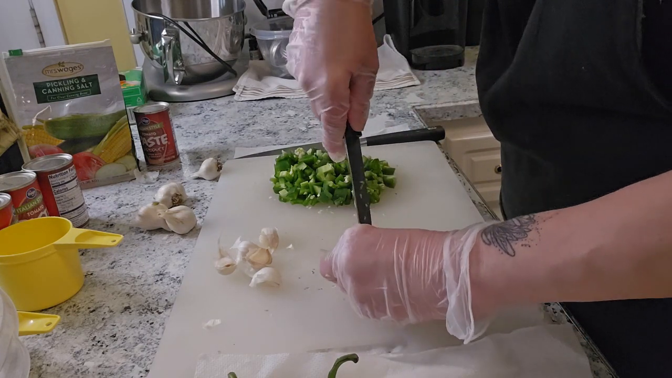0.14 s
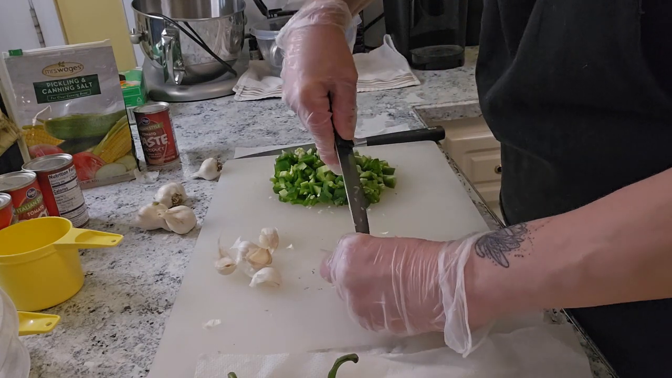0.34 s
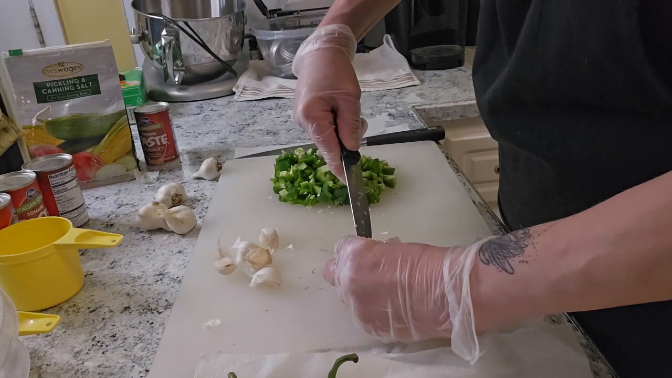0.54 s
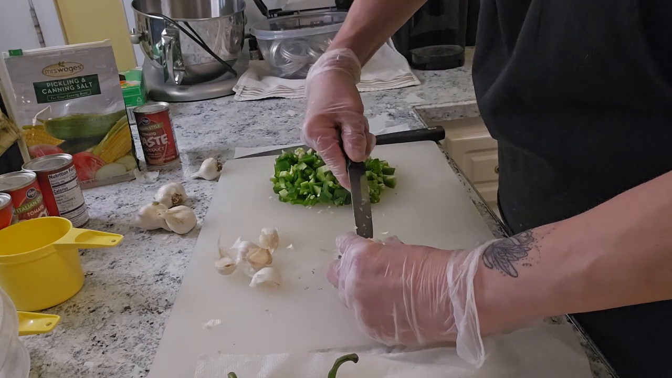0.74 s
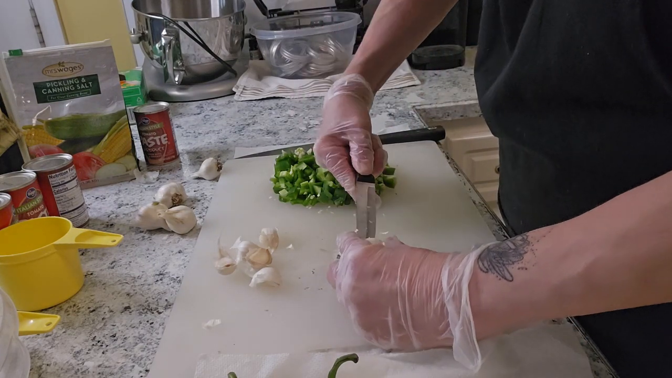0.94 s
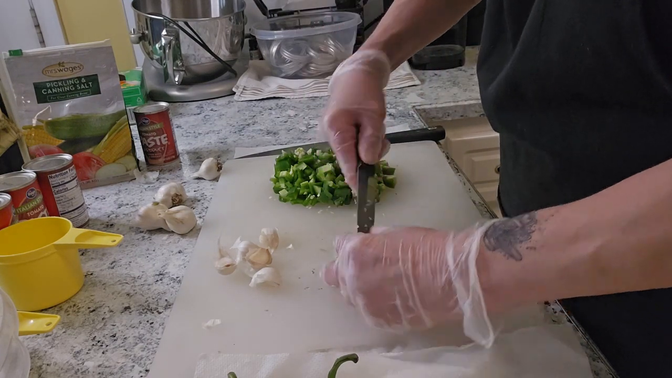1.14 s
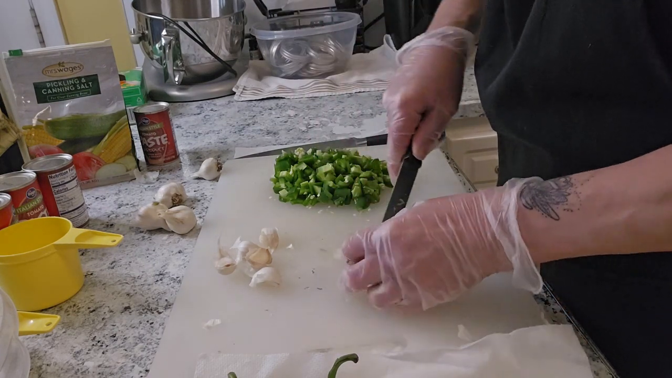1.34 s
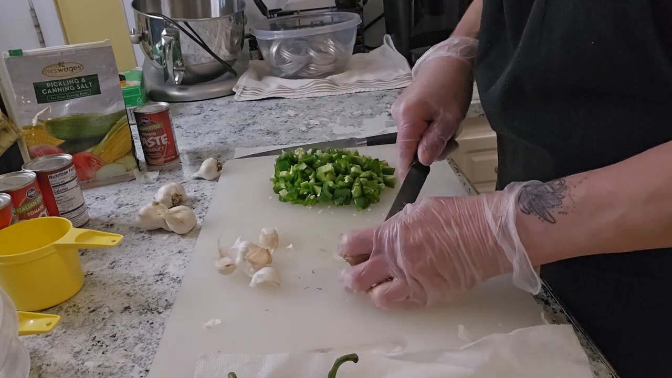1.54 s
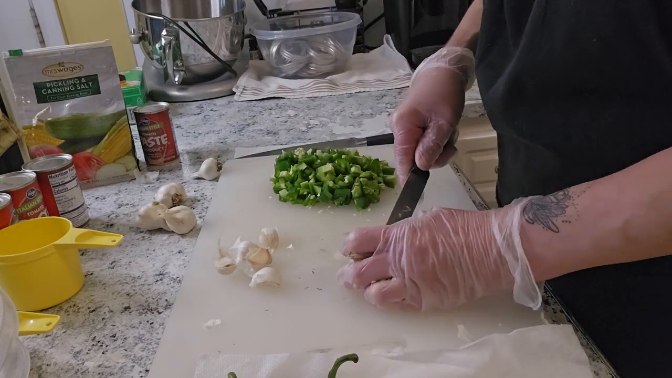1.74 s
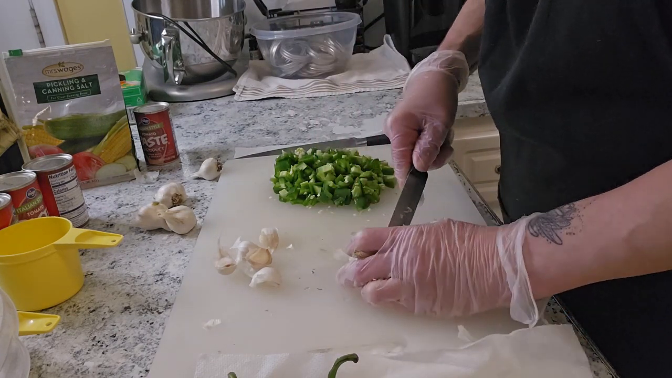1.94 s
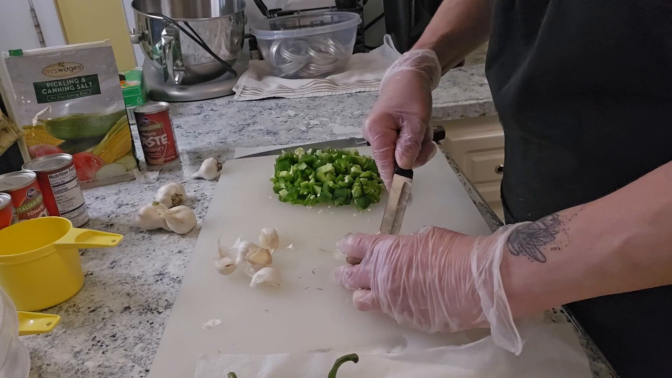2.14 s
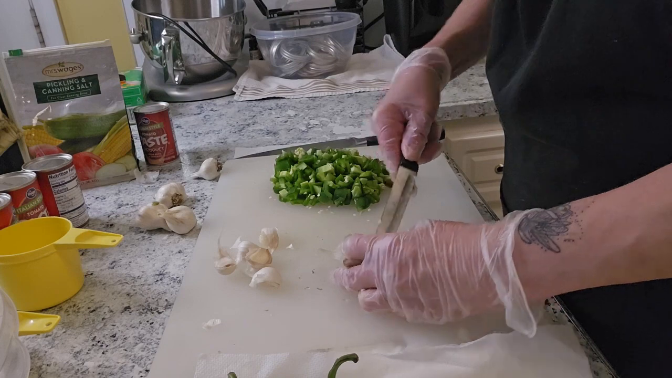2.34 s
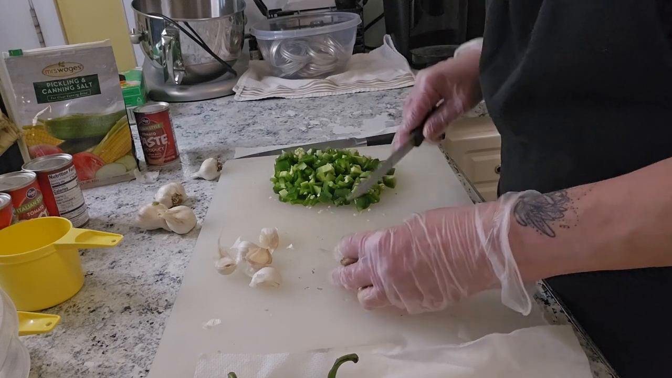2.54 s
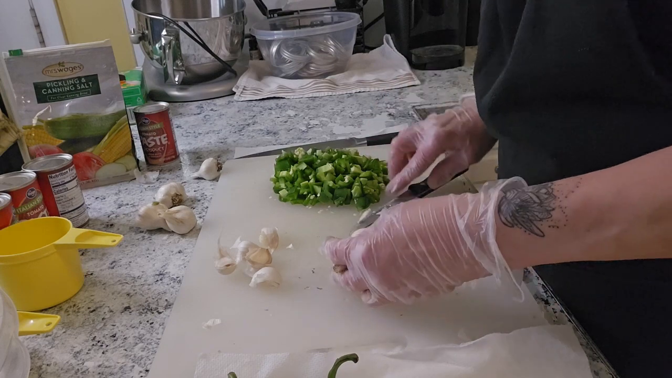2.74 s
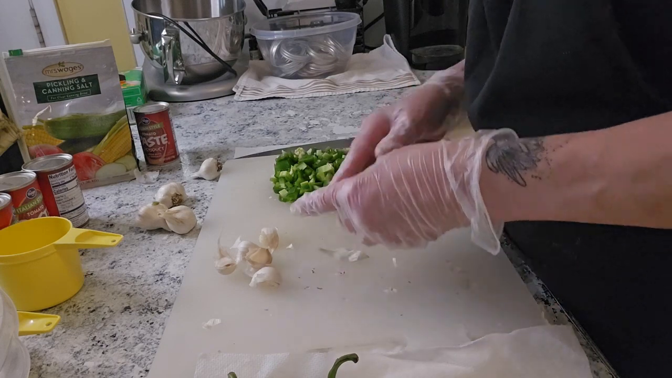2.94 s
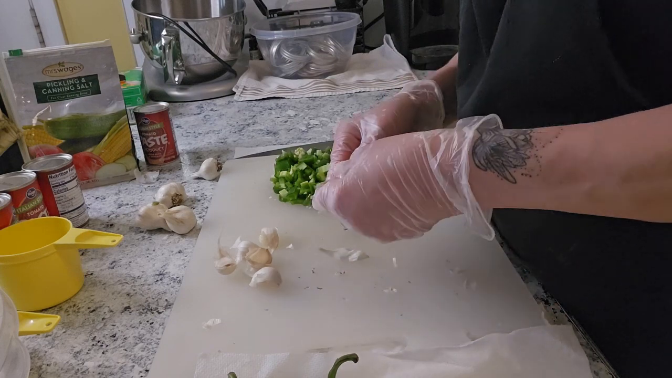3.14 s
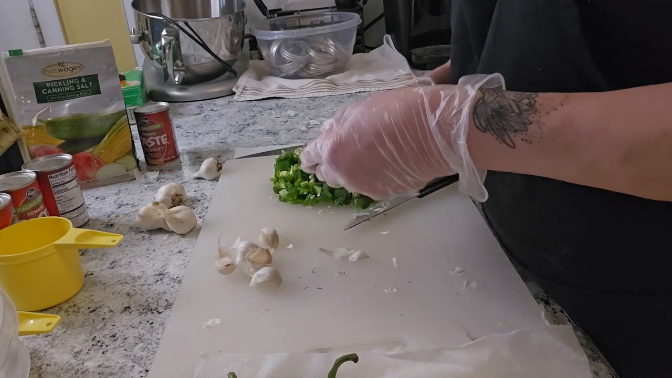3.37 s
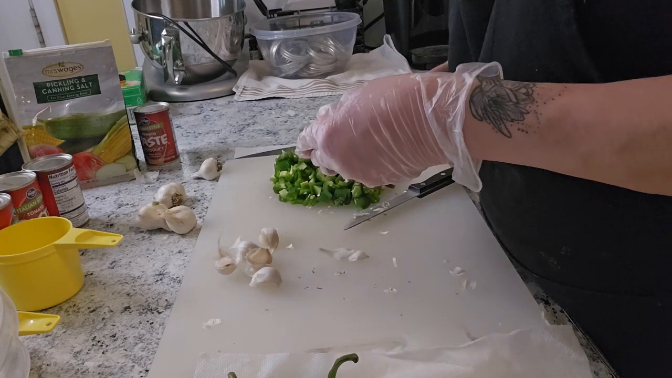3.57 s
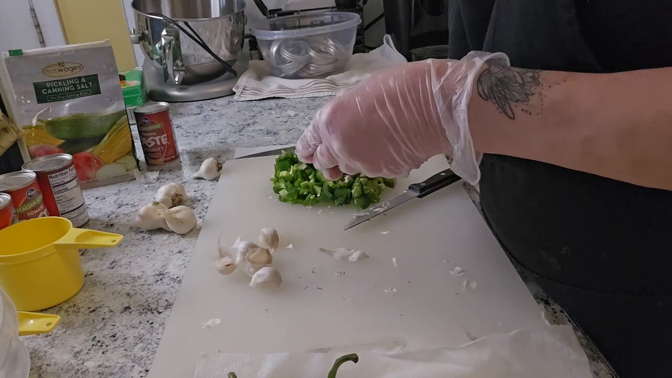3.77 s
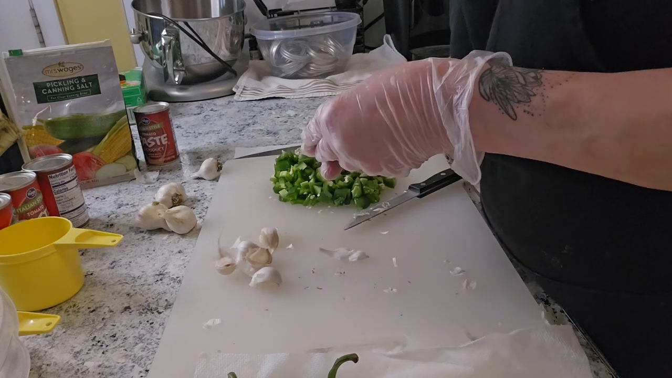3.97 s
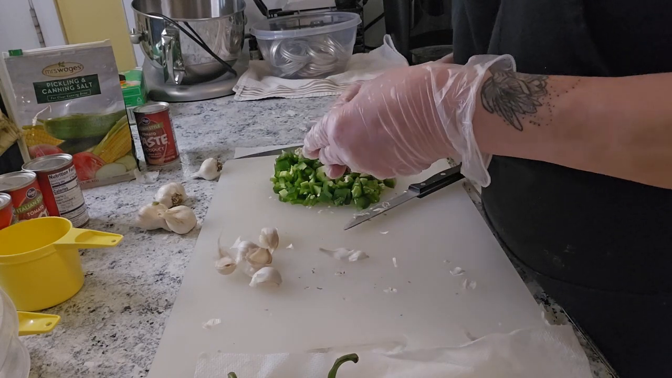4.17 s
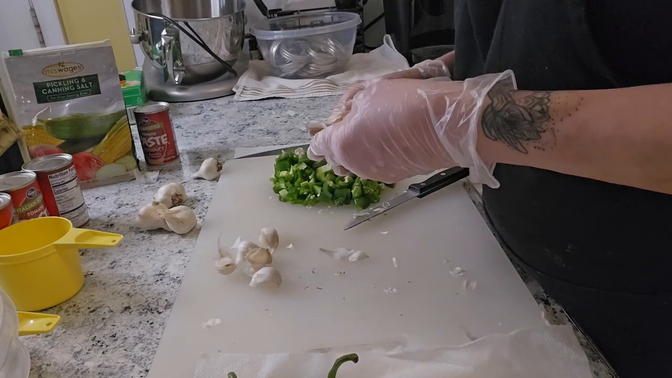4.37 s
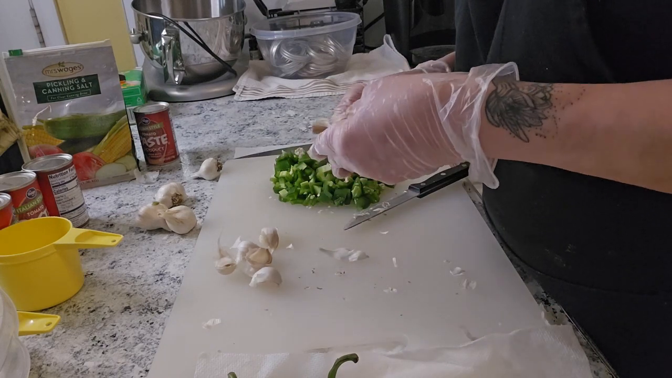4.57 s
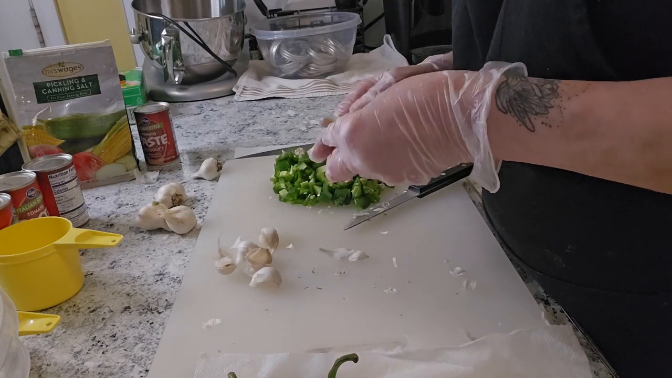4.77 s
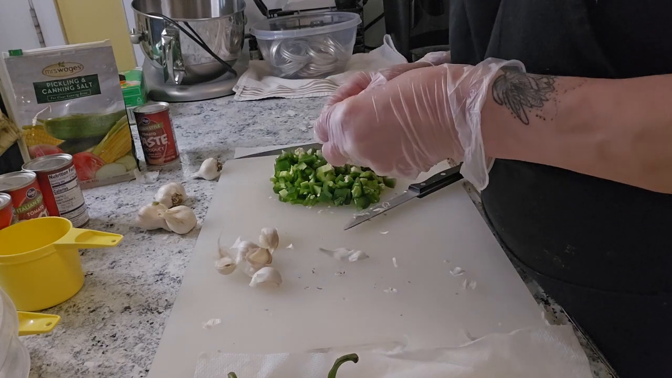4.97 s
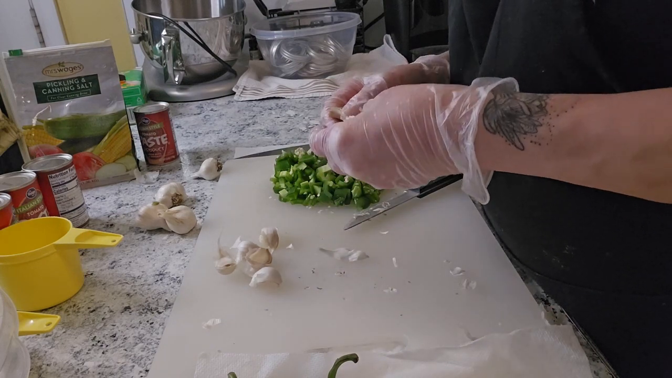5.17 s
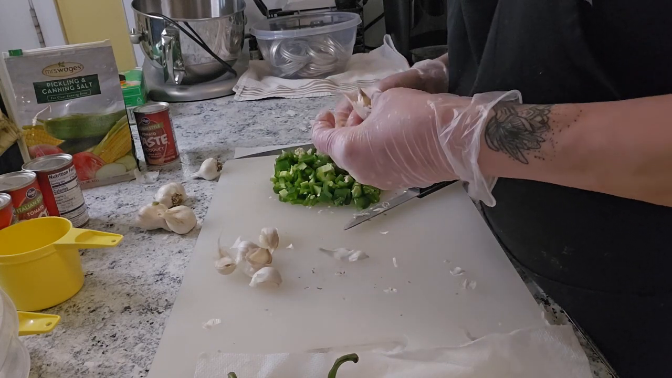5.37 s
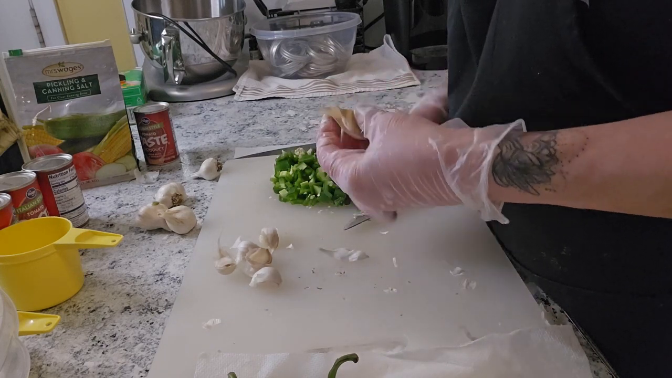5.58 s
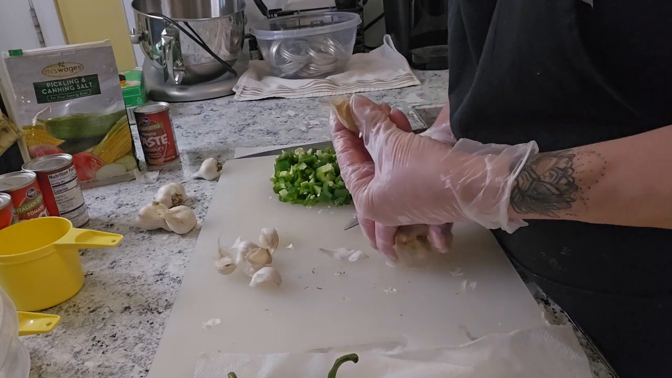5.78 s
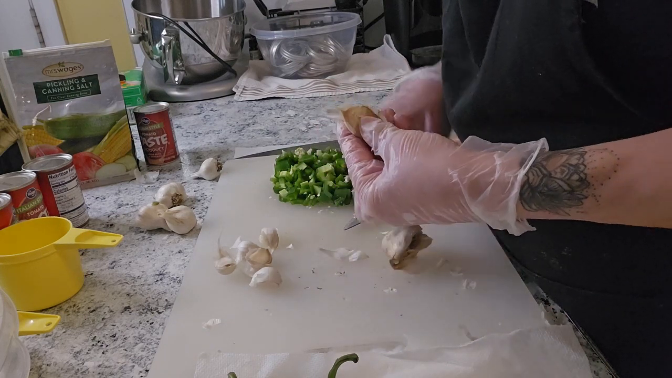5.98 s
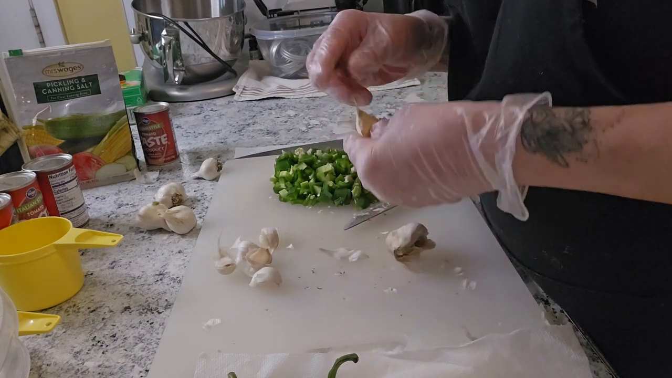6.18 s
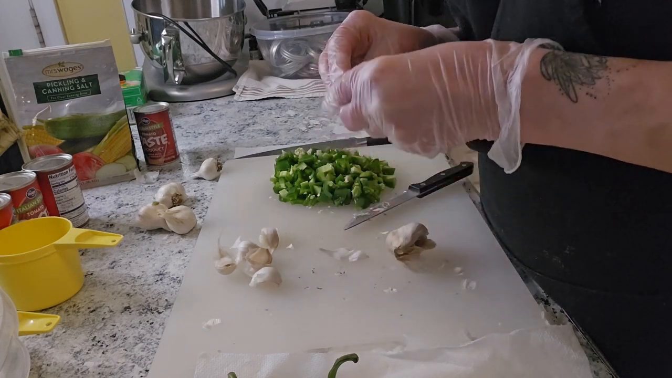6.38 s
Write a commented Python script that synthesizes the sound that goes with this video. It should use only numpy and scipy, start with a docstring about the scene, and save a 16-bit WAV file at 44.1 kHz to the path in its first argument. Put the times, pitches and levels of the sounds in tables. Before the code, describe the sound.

Crisp skin snaps and faint rustling from gloved fingers, one bouncing knife knock on a cutting board, and a low appliance hum.

```python
"""Gloved hands pry and peel dry garlic skins over a cutting board, an arm's length from two microphone ports.
The skins crack in short noise bursts over a fine rustle, a swarm of tiny bursts that follows the fingers.
A knife knocks and bounces on the board: ringing tones, a dull noise clack and a bright noise tick.
Soft bumps ring the counter in low tones, and a small hard room answers hands and knife with a noise tail.
An appliance hums in the quiet kitchen: wavering motor tones over steady air noise."""
import sys
import numpy as np
from scipy import signal
from scipy.fft import rfft, irfft, next_fast_len
from scipy.io import wavfile
from scipy.ndimage import uniform_filter1d

SR = 44100
rng = np.random.default_rng(int(sys.argv[2]) if len(sys.argv) > 2 else 0)


def attenuation_scalar(level_db):
    """Turn a level in dB into a linear amplitude multiplier (20 dB per decade)."""
    decades = np.asarray(level_db, float) / 20
    return 10 ** decades


def master_out(mix):
    """Clip the mix to full scale and print it as 16-bit PCM to the path in sys.argv[1]."""
    frames = np.transpose(np.atleast_2d(mix))
    ceiling = np.clip(frames, -1, 1)
    pcm = np.round(ceiling * 32767).astype(np.int16)
    wavfile.write(sys.argv[1], SR, pcm)


N = 282769
T = np.arange(N) / SR
LAG = 6  # samples by which the right port hears later


def shaped(x, points):
    """Filters a sound by a gain curve through (Hz, dB) points, joined on a log-frequency axis."""
    n = next_fast_len(x.shape[-1])
    hz, db = np.transpose(points)
    log_hz = np.log(np.maximum(np.arange(n // 2 + 1) * SR / n, 1))
    gain = attenuation_scalar(np.interp(log_hz, np.log(hz), db))
    return irfft(rfft(x, n) * gain, n)[..., :x.shape[-1]]


def unit(x):
    """Scales a sound to rms 1."""
    return x / np.sqrt(np.mean(x ** 2))


def even(x):
    """Evens out the slow swells of a noise and brings its rms near 1."""
    local_power = uniform_filter1d(np.mean(x ** 2, 0), size=130)
    return x / np.sqrt(local_power + 0.14 * np.mean(x ** 2))


def walk(rate):
    """Random wander around 0: a new value every 1 / rate seconds, smoothed twice."""
    k = int(SR / rate)
    held = np.repeat(rng.standard_normal(N // k + 1), k)
    return 1.04 * uniform_filter1d(uniform_filter1d(held, k), k)[:N]


def ports(points, left_db, apart):
    """Coloured noise at both ports: the left hears it earlier and left_db louder, and a share differs."""
    same, *own = shaped(rng.standard_normal((3, N)), points)
    both = np.array([same, np.roll(same, LAG)]) + apart * np.array(own)
    return both * attenuation_scalar(np.array([[left_db], [-left_db]]) / 2)


def bursts(s, db, ms, rise=0.5, count=500):
    """Loudness curve of bursts that peak at s: each rises and falls; the longer the burst, the longer its rise."""
    ms = np.clip(ms, .2, 6)[:, None]
    offset = np.arange(count) - count // 3
    k = offset / (ms * SR / 1000)
    shape = np.exp(np.where(k < 0, k / (rise * np.sqrt(ms)), -k / 1.05))
    at = np.clip((s * SR).astype(int)[:, None] + offset, 0, N - 1)
    power = (attenuation_scalar(db)[:, None] * shape) ** 2
    return np.sqrt(np.bincount(at.ravel(), power.ravel(), N))  # overlapping bursts add as power


def ring(s, db, ms, tilt_db, modes, scatter_db):
    """Short smooth pushes ring the modes; every blow lands elsewhere, so each mode gets a new share and sign."""
    out, t = np.zeros(N + SR), np.arange(SR // 2) / SR
    hz, mode_db, t60 = np.transpose(modes)[:, :, None]
    for at, size, contact, tilt in np.broadcast(s, db, ms, tilt_db):
        level_chance, pitch_chance, sign_chance = rng.standard_normal((len(modes), 3)).T[:, :, None]
        share_db = mode_db + tilt * np.log2(hz / hz.mean()) + scatter_db * level_chance
        share = attenuation_scalar(share_db) * np.sign(sign_chance + 0.66)  # more often plus than minus
        decay = np.exp(-np.log(1000) * t / t60)
        tone = share * decay * np.sin(2 * np.pi * hz * (1 + .02 * pitch_chance) * t)
        push = np.hanning(int(max(contact, .05) * SR / 1000) + 3)
        blow = signal.fftconvolve(tone.sum(0), push)
        start = int(at * SR)
        out[start:start + len(t)] += attenuation_scalar(size) * blow[:len(t)] / np.abs(blow).max()
    return out[:N]


def moves(start, hold, db):
    """Level in dB of all finger moves together: each swells quickly, holds and dies away."""
    rise_db_per_s, fall_db_per_s = 900, 296
    t = T[::64, None]
    rise = rise_db_per_s * np.maximum(start - t, 0)
    fall = fall_db_per_s * np.maximum(t - start - hold, 0)
    together = np.sqrt(np.sum(attenuation_scalar(db - rise - fall) ** 2, axis=1))
    return np.interp(T, t[:, 0], 20 * np.log10(together + 1e-9))


def skins():
    """Listed cracks and a random swarm of tiny ones gate one noise; each flake has its own colour."""
    # skin cracks before stutter and stretch: (peak time [s], bright-band peak [dB],
    # body band above it [dB], middle band above it [dB], length [ms])
    crack_list = [(.051, -53.5, -21, -5.5, 2), (.0656, -50.5, -15.5, -6, 2.1), (.1432, -45, -12, -26, 0.99),
                  (.1725, -42, -22, -18, 0.48), (.2287, -47, -14, -11, 2.1), (.2347, -44, -21, -5, 1.6),
                  (.2444, -47.5, -6, 9.5, 1.1), (.2902, -48, -18, -6, 1.5), (.356, -32, -30, -10, 1.3),
                  (.3792, -38, -20, -11, 1.1), (.3935, -32.5, -16.5, -16, 1.5), (.4488, -55, -26, 9, 1.2),
                  (.469, -51, -4, 2, 1.1), (.4859, -37, -3.5, 0, 0.8), (.4934, -26, -26, -7.5, 1.5),
                  (.6363, -37.5, -22, -5, 1.47), (.6627, -58, 8.5, 16, 1.2), (.6902, -59.5, 12, 19, 1.06),
                  (.7092, -41.5, -32, -7, 2.3), (.728, -38.5, -27, -5, 0.87), (.7657, -36, -24, -3, 1),
                  (0.775, -47, -16.5, -10.5, 4), (.7965, -33, -21, -5, 2), (.8035, -51, -18, 3, 2.9),
                  (.8132, -44.5, -4, -1, 3.7), (.8957, -53, -9, 6.5, 2), (1.0516, -50, -18, -8, 1.3),
                  (1.1862, -41.5, -11, -30, 1.8), (1.3096, -49, -9, -1, 1.4), (1.4868, -57.5, -14, 4, 1.4),
                  (1.6003, -40, -42, -12.5, 1), (1.716, -50, -21, 2.5, 2.4), (1.7264, -46, -13, -1, 1.7),
                  (1.7669, -44, -23, -7, 3.1), (1.7995, -38.5, -14, 0.5, 2.1), (1.8097, -46.5, -12, 7, 1.9),
                  (1.8178, -43, -6, 4, 1.3), (1.8255, -34.5, -5, -5, 1.1), (1.829, -42, -10, -6, 4.5),
                  (1.8456, -42, 0, -11.5, .34), (1.9848, -36, -9, 2, 1.8), (2.0118, -50, -12, 10, 1),
                  (2.0247, -50.5, 3, 8, 3.9), (2.0602, -43, -50, -8, 5), (2.0722, -38.5, -30, 10.5, 0.35),
                  (2.0953, -70, 25, 4, 2.8), (2.2843, -32, -26, -33, 0.42), (2.3014, -45, -16, -0.5, 2.7),
                  (2.335, -34, -22, -34, 1.1), (2.358, -45.5, -8, 0, 1.8), (2.4086, -45.5, -11, -10, .83),
                  (2.4932, -48, -31, -21, 1.2), (3.0291, -56, -4, 2, 1), (3.0926, -36.5, -7, 1, 0.96),
                  (3.1685, -61, -19, 9, 1.3), (3.3037, -56.5, -5.5, 6, 2.1), (3.7028, -51.5, -6, 4.5, 2.6),
                  (3.8493, -47.5, -7, 2, 0.74), (3.9402, -50, -10, -14, 0.93),
                  (4.1085, -44.5, -10.5, 3.5, 1.34), (4.2273, -51.5, -3, 9.5, 0.67),
                  (4.3038, -68, 13, 9, .74), (4.3277, -53, -15, 8, 1.6), (4.3524, -57.5, -21, 6, 2.5),
                  (4.5079, -44.5, -21, -1, 1.7), (4.547, -31.5, -19, -3, 0.88),
                  (4.7475, -45, -29, -16, 1.5), (4.7789, -40.5, -28, -31, 1.8), (4.93, -50, -12, -9, 2.3),
                  (4.9827, -57, 10, -7, 0.85), (4.996, -39.5, -38, -11, 1.3), (5.0603, -35, -9.5, 1, 1.42),
                  (5.1819, -31.5, -3.5, -10, 0.83), (5.189, -47.5, -15, 3, 5.4),
                  (5.2042, -42, -25, -1, 2.6), (5.223, -36, -24, -12, 1.4), (5.234, -28, -27, -10, 1.4),
                  (5.2365, -20, -2.5, -8, 0.84), (5.247, -24, -9, -1, 3.8),
                  (5.395, -26.5, -39, -16.5, 2.23), (5.4033, -40.5, -14, -8, 0.67),
                  (5.561, -33.5, -32, -11, 1.05), (5.584, -35.5, -14.5, -23, 0.69),
                  (5.5943, -38.5, -28, -16, .9), (5.6099, -26.5, -24, -7, 1.5),
                  (5.7757, -38.5, -22.5, -16, 2.7), (5.8861, -35, -5, 1.5, 0.74),
                  (5.9038, -29.5, -37, -15, 1.3), (5.909, -40, -29.5, -9, .6), (5.929, -25, -27, -15, 1.2),
                  (5.9442, -25.5, -22, -10, 2.05), (5.9783, -51, -25, -3.5, .55),
                  (6.0675, -48, -29, -10, 1.6), (6.1724, -39, -38.5, -16, 2.7), (6.1828, -44, -7, -12, 1.2),
                  (6.2438, -33.5, -15.5, -9, 1.3), (6.278, -45, -39, -7, 4.7), (6.353, -43, -5, -10, .75),
                  (6.3685, -43.5, -22, -9, 1.8), (6.4, -46.5, -12, -11, 3.9)]
    # finger moves that rustle the skin, before the band trims:
    # (start [s], hold [s], treble level [dB], body above it [dB])
    rustle_list = [(0, .04, -63, -11), (0.061, 0.025, -58, 2.5), (0.13, .08, -59.5, -11),
                   (.228, 0.068, -53.5, -19), (0.34, 0.034, -55.5, -11), (0.442, .04, -56, -9),
                   (.485, 0.036, -56.5, -2), (0.532, .04, -59.5, -8), (0.613, 0.13, -58.5, -9),
                   (0.766, 0.046, -45, -22), (0.88, 0.04, -60, -18), (1.048, .1, -58, -4),
                   (1.17, 0.069, -59, -0.5), (1.282, 0.033, -56, -26), (1.349, 0.011, -68, 6.5),
                   (1.393, .08, -78, 2), (1.468, 0.074, -62, -14), (1.6, 0.057, -67.5, -15),
                   (1.685, 0.095, -60, -13), (1.801, 0.068, -47.5, -1), (1.974, 0.098, -50, -14),
                   (2.067, 0.016, -61, 6), (2.16, 0.024, -63, -1), (2.246, .01, -66, -3),
                   (2.276, 0.097, -56, -6.5), (2.382, 0.029, -58, -1.5), (2.48, 0.12, -68, -2),
                   (2.592, 0.081, -63, 8), (2.784, 0.1, -74, 17), (2.952, 0.01, -51, -26),
                   (3.023, .04, -61, -2.5), (3.084, 0.034, -59, -6), (3.16, .09, -67.5, -9),
                   (3.3, 0.021, -72, 0.5), (3.338, 0.047, -83.5, -2), (3.646, 0.017, -70, 5),
                   (3.689, 0.022, -61.5, -3), (3.752, .05, -76, -2), (3.831, 0.043, -56.5, -7),
                   (3.937, .02, -65.5, -3), (4.018, 0.022, -60, -7), (4.1, 0.027, -60, -5),
                   (4.166, .08, -61.5, -4), (4.29, 0.075, -58, -6.5), (4.408, 0.038, -58.5, -13),
                   (4.512, 0.1, -65, -6), (4.651, 0.042, -62, 0.5), (4.73, 0.089, -56, -10.5),
                   (4.86, 0.017, -53.5, -5), (4.92, 0.061, -57, 3), (5.025, 0.026, -53.5, -15),
                   (5.103, .07, -71, 2), (5.181, 0.069, -44.5, -11), (5.285, 0.038, -51.5, -3),
                   (5.368, 0.018, -56.5, -9), (5.453, 0.066, -62, -7), (5.555, 0.14, -53, -9),
                   (5.737, .04, -60, -16), (5.769, 0.12, -51.5, -13), (5.874, 0.11, -51, -29),
                   (6.006, .06, -63.5, -22), (6.161, 0.057, -54.5, -17), (6.231, 0.21, -51.5, -11.5)]
    # colour of the skin noise before it is evened out: (frequency [Hz], relative level per Hz [dB])
    skin_colour = [(290, -37), (500, 4), (952, -13.5), (1020, -16), (1100, -8.5), (1980, -2.5), (2290, -9),
                   (2940, -1), (4420, -2), (7060, -2.5), (10800, -13.5), (15300, -14), (16500, -43)]
    # bright, body, middle and top band of the skin sound: (low edge [Hz], high edge [Hz])
    band_edges = [(5500, 10000), (800, 2500), (2500, 5500), (10000, 17500)]
    noise = ports(skin_colour, left_db=2.0, apart=0.59)
    s, db, body_db, middle_db, ms = np.transpose(crack_list)
    # a sharp snap spreads both ways: the more body and the more force it has, the more top
    top_db = 2.5 + 0.36 * body_db + 0.04 * (db + 44)
    colour_db = [0, body_db, middle_db, top_db]
    # swarm: many faint buckles, a few strong ones, coming in clumps
    chance = rng.random((5000, 7)).T
    at = chance[0] * N / SR
    size_db = np.minimum(-3.5 * np.log(1 - chance[1]), 14)
    flake_ms = .5 + 2.0 * chance[2]
    clump = attenuation_scalar(2.0 * walk(40))
    grit = attenuation_scalar(2 * walk(1200))  # a tear is many fibres letting go, so it stutters
    start, hold, move_db, deep_db = np.transpose(rustle_list)
    fine_db = moves(start, hold, move_db)
    low_db = moves(start, hold, move_db + deep_db)
    # the middle of the rustle follows both its treble and its body
    swarm_db = [fine_db - 7.0, low_db - 8, 0.55 * fine_db + .4 * low_db - 5.5, fine_db - 6.5]
    stretch = [0.61, 1.48, 1.25, 1.54]  # crack length factor in each band
    out = 0
    for k, (lo, hi) in enumerate(band_edges):
        low_side = [(.6 * lo, -36), (.85 * lo, -8), (1.1 * lo, 0)]
        high_side = [(.9 * hi, 0), (1.15 * hi, -8), (1.6 * hi, -36)]
        band = even(shaped(noise, low_side + high_side))
        cracks = bursts(s, db + colour_db[k], stretch[k] * ms) * grit
        flakes = bursts(at, size_db + 18 * chance[3 + k], flake_ms, count=150)
        swarm = unit(flakes + .5) * clump
        out = out + band * (cracks + attenuation_scalar(swarm_db[k]) * swarm)
    return out


def appliance():
    """Motor tones that waver in level and pitch, over air noise most alike at both ports near 150 Hz."""
    # motor tones before wavering and balance: (frequency [Hz], rms level [dB])
    motor_lines = [(118.4, -78.5), (181.5, -67), (362.5, -69.5), (544, -81), (726, -79.5)]
    # colour of the air noise before its level is set: (frequency [Hz], relative level per Hz [dB])
    air_colour = [(25, -10), (100, -10.5), (175, -1.5), (270, -2.5), (325, -10), (410, -12.5), (600, -14),
                  (800, -20.5), (1000, -25), (2200, -29), (6550, -37.5), (10700, -38.5), (15200, -43),
                  (16500, -52.5)]
    hum = 0
    for hz, db in motor_lines:
        level = attenuation_scalar(db + 1 * walk(9.0)) * np.sqrt(2)
        drift = np.cumsum(.5 * walk(8.9)) / SR  # cycles
        hum = hum + level * np.sin(2 * np.pi * (hz * T + drift + rng.random()))
    mid, side = shaped(rng.standard_normal((2, N)), air_colour)
    side = shaped(side, [(60, -5.0), (150, -18), (300, -7.0), (700, -1.5), (1400, -0.5)])
    air = attenuation_scalar(-61) * (mid + side * np.array([[1], [-1]])) / np.std(mid)
    return (air + hum) * attenuation_scalar(np.array([[.8], [-.8]]))  # a little louder on the left


def kitchen(x, wet_db):
    """Diffuse tail that builds up after the first walls answer, shorter in the treble, other at each port."""
    # how long the room rings: (band centre [Hz], time to fall by 60 dB [s])
    room_decay = [(500, 0.27), (1500, 0.18), (4000, 0.13), (11000, 0.13)]
    t = np.arange(SR // 2) / SR
    tail = 0
    for hz, t60 in room_decay:
        band = [(hz / 2.4, -30), (hz / 1.6, 0), (hz * 1.6, 0), (hz * 2.4, -30)]
        noise = shaped(rng.standard_normal((2, len(t))), band)
        tail = tail + noise * np.exp(-np.log(1000) * t / t60)
    tail = tail * np.minimum(t / .005, 1) ** 2  # builds up over 5 ms
    tail = tail / np.sqrt(np.sum(tail ** 2) / 2)
    return attenuation_scalar(wet_db) * signal.fftconvolve(x, tail, axes=1)[:, :N]


def counter_bumps():
    """Hands bump the counter: soft, longer pushes ring its low modes, alike at both ports."""
    # soft bumps: (time [s], peak level [dB], contact [ms])
    bump_list = [(.004, -52, 3.6), (0.072, -39, 2.8), (.095, -33.5, 2.2), (0.114, -44, 2.2),
                 (0.144, -42, 3.8), (0.629, -62, 6), (1.979, -55, 2.2), (2.09, -54, 6), (2.309, -55.5, 6),
                 (2.689, -58, 5), (5.884, -54, 0.65), (5.93, -57, 7.6)]
    # counter modes before scatter: (frequency [Hz], level [dB], time to fall by 60 dB [s])
    counter_modes = [(62, -10, 0.44), (104, -2.5, 0.19), (137, -3.5, .12), (227, -9.5, 0.046),
                     (396, -14.5, 0.051)]
    s, db, ms = np.transpose(bump_list)
    return ring(s, db, ms, 0, counter_modes, scatter_db=2.5)


def knife():
    """The blade drops on the board, bounces and rattles: modes, a dull clack and a bright tick at each contact."""
    # knocks before the trims below: (time [s], ring peak [dB], tilt [dB per octave], clack [dB], tick [dB])
    knock_list = [(2.5980, -21.5, 5.5, -13.5, -17.5), (2.6060, -23.5, -5.5, -25.5, -45.5),
                  (2.669, -29.5, -4, -39, -58.5), (2.6748, -17.5, -2, -38, -26),
                  (2.6863, -9, 7.5, -27, -8.5), (2.6941, -19.5, 4.5, -15.5, -18),
                  (2.6966, -21.5, -5, -16, -22.5), (2.7022, -30.5, -4.5, -40.5, -46.5),
                  (2.738, -36.5, -12.5, -37.5, -45.5), (2.7490, -29.5, 1, -30, -38),
                  (2.7800, -30.5, 1.5, -32, -32), (2.8100, -37, -5.5, -35, -60)]
    # modes of board and blade before tilt and scatter:
    # (frequency [Hz], level [dB], time to fall by 60 dB [s])
    board_modes = [(108, -14.5, 0.11), (293, -12, 0.094), (434, -12, 0.053), (573, -8, 0.079),
                   (684, -7.5, 0.11), (752, -2, 0.094), (878, -1, 0.031), (990, -8, 0.071),
                   (1100, -11.5, 0.0326), (1264, -10.5, 0.18), (1420, -2.5, 0.045), (1417, -16.5, 0.073),
                   (1632, -10, 0.077), (1930, -6, 0.0627), (2240, -5, .05), (2520, -4, 0.032),
                   (3160, -8.5, 0.032), (3280, -5.5, 0.025), (4350, -23.5, .03)]
    s, db, tilt_db, clack_db, tick_db = np.transpose(knock_list)
    clack_colour = [(300, -22.0), (700, -6.5), (2500, -5.0), (4000, -7.5), (6000, -34.0)]
    tick_colour = [(2000, -9.0), (4000, 2.5), (6500, 0.5), (9000, -27.0), (16000, -30)]
    clack = even(ports(clack_colour, left_db=4.0, apart=.4))
    tick = even(ports(tick_colour, left_db=-2.5, apart=.5))
    board = ring(s, db, .15, tilt_db, board_modes, scatter_db=3.5)
    # low cut: takes the slow offset out of the knocks, leaving the ringing tones
    board = shaped(board, [(30, -25.5), (80, 0.5)])
    board = np.array([attenuation_scalar(1.0) * board, attenuation_scalar(0.64) * np.roll(board, LAG)])
    # clack and tick peak a moment after the contact
    clack_level = bursts(s + 0.00022, clack_db - 4.5, 2.0 + 0 * s, rise=0.025)
    tick_level = bursts(s + 0.0011, tick_db, 0.95 + 0 * s, rise=0.063)
    return board + clack_level * clack + tick_level * tick


def scene():
    """Hands and knife near the ports, in the room, with counter bumps, over the hum."""
    hands, blade = skins(), knife()
    answer = kitchen(hands, wet_db=-7) + kitchen(blade, wet_db=-8.5)
    return hands + blade + answer + counter_bumps() + appliance()


def top_cut(x):
    """Nothing passes above the cut-off."""
    return signal.sosfilt(signal.butter(12, 16960, fs=SR, output="sos"), x)


def record(dry):
    """Finishes the mix with a steep low-pass near 16 kHz."""
    mix = shaped(dry, [(15700, -1.0), (16100, -18.5), (17000, -25.5)])
    return top_cut(mix)


dry = scene()
out = record(dry)
master_out(out)
```